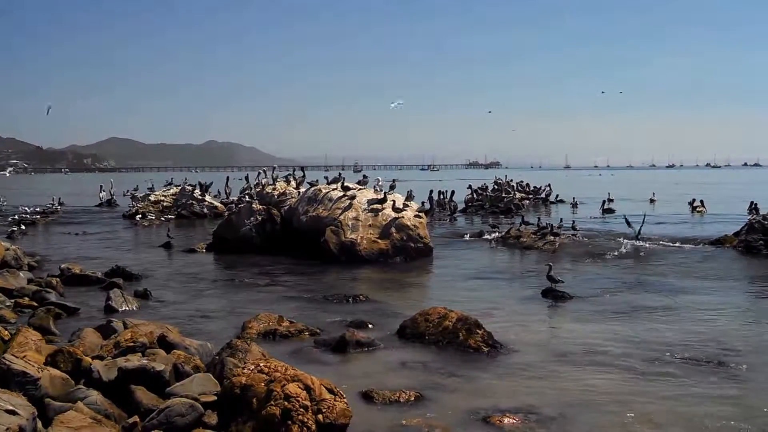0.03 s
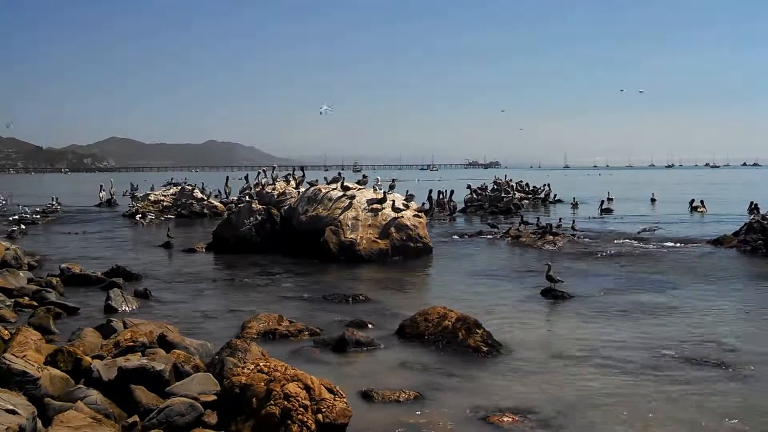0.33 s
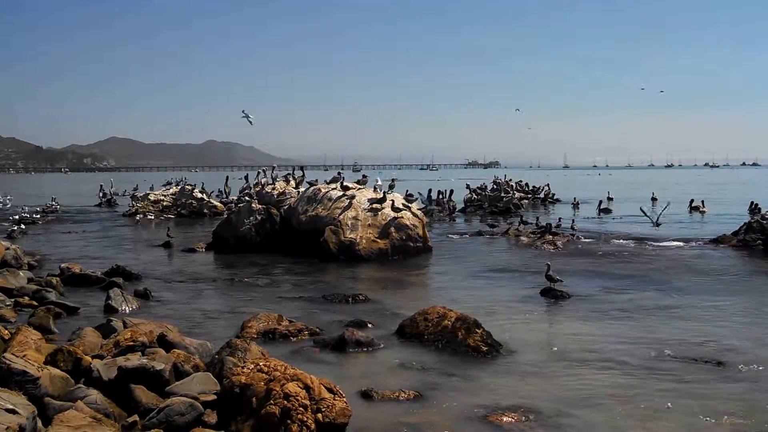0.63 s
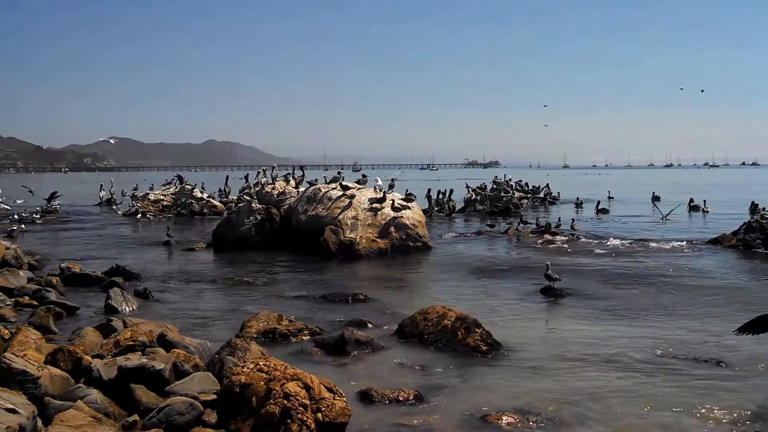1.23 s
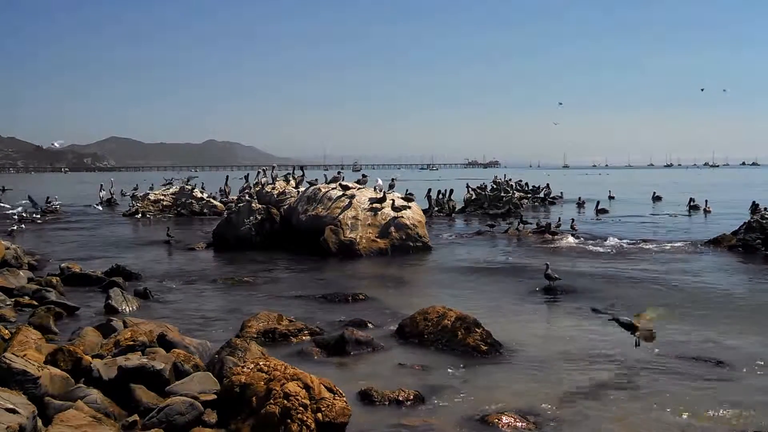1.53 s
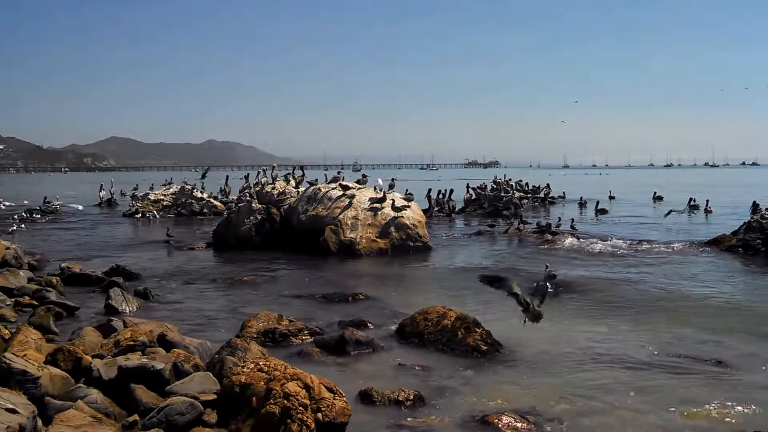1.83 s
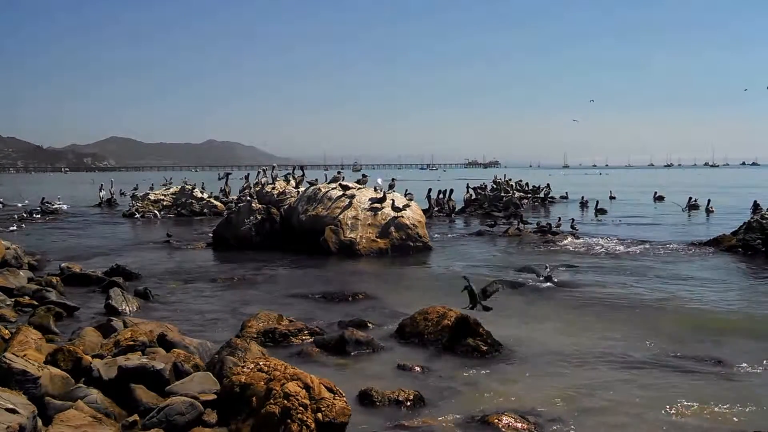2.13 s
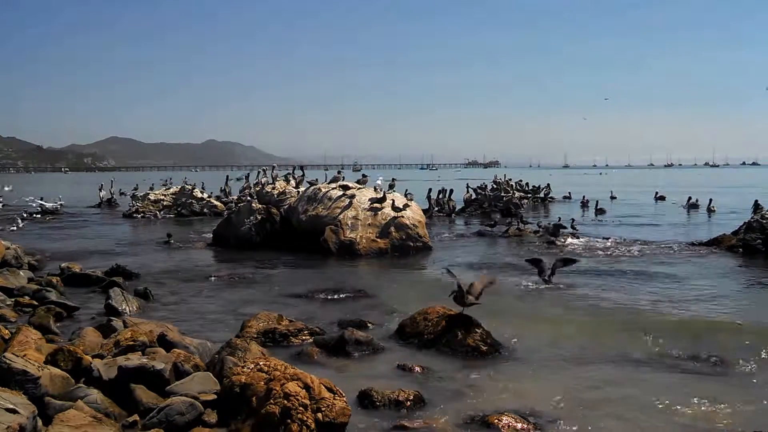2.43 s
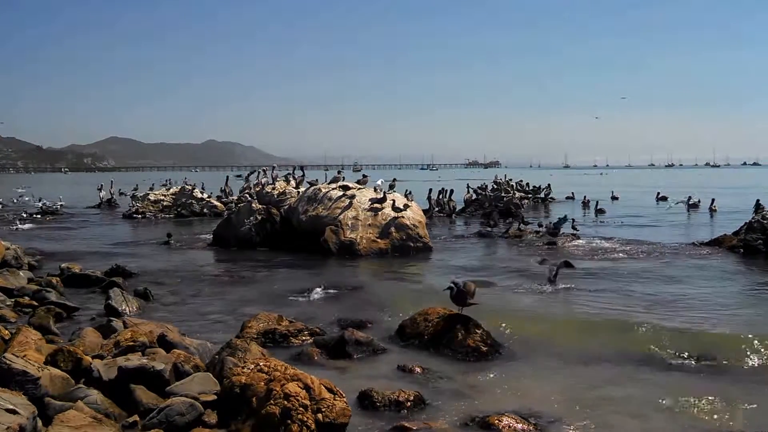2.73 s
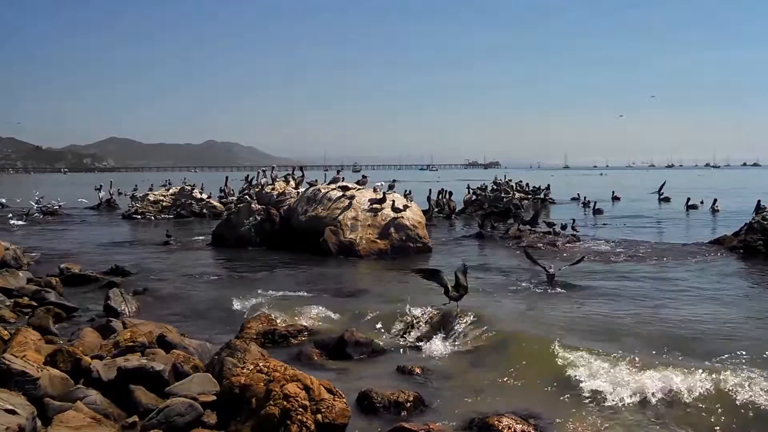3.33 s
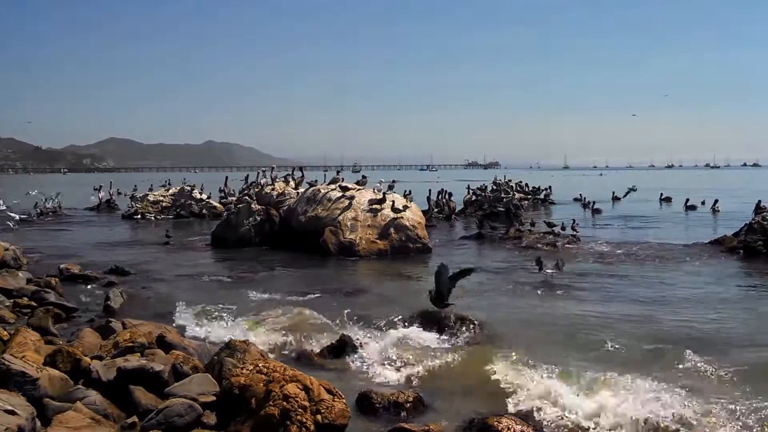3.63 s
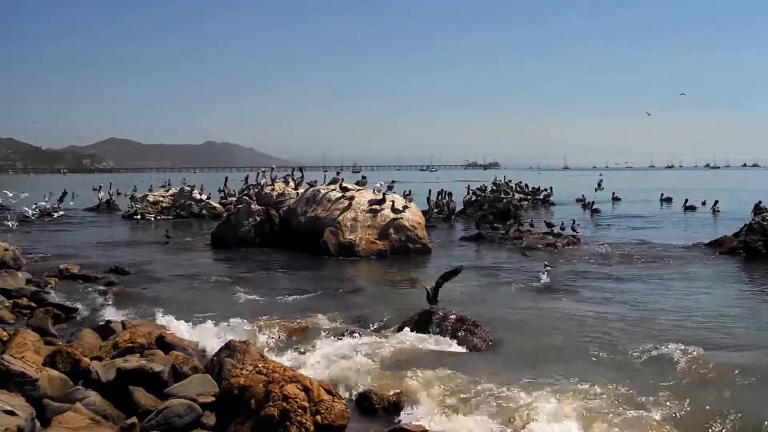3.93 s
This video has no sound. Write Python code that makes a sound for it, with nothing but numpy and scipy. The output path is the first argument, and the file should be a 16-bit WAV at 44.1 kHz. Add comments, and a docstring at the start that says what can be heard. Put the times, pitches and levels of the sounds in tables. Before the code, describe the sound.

A seabird colony calls in short bursts as water laps and a wave washes in.

```python
"""A seabird colony on offshore rocks. From the start, water laps on the stony shore under a distant
chatter, while gulls yelp hoarsely and mew nasally, their harmonics shaped by throat and bill. Thin
whistles join in, two drips tick on the stones, and a treble hiss swells with the calls. After two
seconds come fast, rattling trills; at three a wave breaks into a foam of ringing bubbles, and the
hiss rises as spray. Throughout, the right microphone is inverted and slightly late."""
import sys
import numpy as np
from scipy import signal
from scipy.fft import rfft, irfft, next_fast_len
from scipy.io import wavfile

SR = 44100
rng = np.random.default_rng(int(sys.argv[2]) if len(sys.argv) > 2 else 0)


def store_wav(level_fs):
    """Save 16-bit WAV to argv[1]."""
    pcm = np.round(np.clip(np.atleast_2d(level_fs), -1, 1) * 32767)
    wavfile.write(sys.argv[1], SR, pcm.T.astype(np.int16))


N = 176400
TIME = np.arange(N) / SR
FADE_S, JITTER_HZ = .022, 250
MEW_ARCH, MEW_FOCUS = .075, 1.3


def from_db(db):
    """Amplitude grows tenfold for every 20 dB."""
    return 10 ** (np.asarray(db) / 20)


def unit_rms(x):
    """Dividing by the rms gives unit mean power."""
    return x / np.sqrt(np.mean(x ** 2) + 1e-20)


def in_time(rows):
    """Linear interpolation gives a control value at every sample."""
    return np.interp(TIME, *np.transpose(rows))


def at_hz(rows, hz):
    """Interpolation on a logarithmic frequency axis reads a spectrum."""
    row_hz, values = np.transpose(rows)
    return np.interp(np.log(hz + 1e-9), np.log(row_hz), values)


def drift(rate_hz, size):
    """Interpolated noise wanders smoothly, mostly below the given rate."""
    position = np.arange(size) * 2 * rate_hz / SR
    knots = rng.standard_normal(size // 8 + 2)
    return np.interp(position, np.arange(len(knots)), knots)


def add(out, start_s, sound):
    """Superposition: a sound adds to the mix from its start time."""
    i = int(start_s * SR)
    a, b = max(i, 0), min(i + len(sound), N)
    if b > a:
        out[a:b] += sound[a - i:b - i]


def surging_noise(spectrum, surge_db, bands=19):
    """Partly coherent stereo noise in half-octave bands, each with a random amplitude modulation."""
    # Each row: frequency in Hz, coherence of the two microphones from 0 to 1.
    coherence = [(60, .98), (400, .52), (800, .6), (1400, .85)]
    out, common_surge = 0, drift(4, N)
    edges = np.geomspace(25, 18000, bands + 1)
    white = rng.standard_normal((2, 2, N))
    for k, (low, high) in enumerate(zip(edges, edges[1:])):
        band = signal.butter(2, [low, high], "band", fs=SR, output="sos")
        mid, side = signal.sosfilt(band, white[k % 2])
        hz = np.sqrt(low * high)
        alike = at_hz(coherence, hz)
        gain = from_db(at_hz(spectrum, hz) + surge_db * (.27 * common_surge + drift(14, N)))
        out = out + gain * (np.sqrt(1 + alike) * mid + np.sqrt(1 - alike) * side * [[1], [-1]])
    return unit_rms(out)


def pops(per_s, low_hz, high_hz, cycles, count=22):
    """Random impulses excite damped resonators, which decay by 60 dB in the given number of cycles."""
    born = rng.random(N) < per_s / SR
    size_db = 3.8 * np.minimum(rng.exponential(1, N), 4)
    impulses = born * from_db(size_db) * rng.choice([-1, 1], N)
    resonator, out = rng.integers(0, count, N), 0
    for k, hz in enumerate(np.geomspace(low_hz, high_hz, count)):
        r, w = from_db(-60 * hz / (cycles * SR)), 2 * np.pi * hz / SR  # pole radius and angle
        drive = impulses * (resonator == k) + 1e-18
        out = out + signal.lfilter([np.sin(w), -np.sin(w)], [1, -2 * r * np.cos(w), r * r], drive) / w
    return unit_rms(out)


def lapping():
    """Water moving on the stony shore radiates steady broadband noise."""
    # Each row: frequency in Hz, relative spectral density in dB.
    spectrum = [(30, 4), (65, 5), (150, -3.5), (400, -2), (800, -4.5), (2400, -2), (4000, -15), (5500, -58),
                (15000, -28)]
    return from_db(-32) * surging_noise(spectrum, surge_db=3)


def breaker():
    """A wash ebbs, then a wave breaks: broadband noise and the resonance of foam bubbles swell as one."""
    # Each row: frequency in Hz, relative spectral density in dB.
    spectrum = [(30, -31), (80, -7), (350, 4.5), (600, 0.5), (1200, -5), (4000, -10), (6000, -31),
                (15000, -17.5)]
    # Each row: time in seconds, gain of the wave in dB.
    swell = [(0, -35), (.4, -33), (1.0, -38.5), (1.35, -54), (2.4, -52), (2.88, -32), (3.05, -24.5),
             (3.3, -22.5), (3.6, -23), (3.9, -21)]
    mid, side = [pops(per_s=900, low_hz=390, high_hz=3900, cycles=7) for _ in range(2)]
    foam = from_db(-9.5) * (mid + .5 * side * [[1], [-1]])
    return from_db(in_time(swell)) * (surging_noise(spectrum, surge_db=2.5) + foam)


def treble_hiss():
    """Amplitude-shaped hiss swells with the gull calls, then rises as spray when the wave breaks."""
    # Each row: frequency in Hz, relative spectral density in dB.
    spectrum = [(2000, 24.5), (4000, -15), (8500, 24.5), (11000, -20), (14000, -17)]
    # Each row: time in seconds, relative level in dB.
    swell = [(0, -49.5), (1.12, -42), (1.35, -48), (1.7, -41.5), (2.8, -40.5), (3.07, -37), (3.55, -31.5),
             (4, -32.5)]
    crackle = from_db(-1) * pops(per_s=1500, low_hz=4150, high_hz=15500, cycles=3)
    hiss = surging_noise(spectrum, surge_db=1.5)
    return from_db(in_time(swell) - 2) * (hiss + crackle)


def drips():
    """A brief impact has a wide spectrum: each drip on stone is a bright, fast-decaying noise burst."""
    # Each row: start in seconds, relative level in dB.
    impacts = [(0.4425, -12.5), (0.6417, -23)]
    out, t = np.zeros(N), TIME[:SR // 30]
    for start, db in impacts:
        add(out, start, from_db(db) / 2 * rng.standard_normal(len(t)) * np.exp(-t / .0017))
    return signal.sosfilt(signal.butter(2, [5500, 14000], "band", fs=SR, output="sos"), out + 1e-18)


def rock_echoes(sound, t60_s=.25, cutoff_hz=7300):
    """Scattering from rocks and water acts as convolution with a dull, exponentially decaying tail."""
    t = TIME[:SR // 2]
    tail = rng.standard_normal(len(t)) * from_db(-60 * t / t60_s) * (t > .004)
    tail = signal.sosfilt(signal.butter(2, cutoff_hz, fs=SR, output="sos"), tail)
    return from_db(-16) * signal.fftconvolve(sound, tail / np.sqrt(np.sum(tail ** 2)))[:N]


def contour(length, hz, glide, arch=0):
    """Time, pitch and envelope of a call: a parabolic arch on a glide from 1 - glide to 1 + glide."""
    t = np.arange(int(length * SR)) / SR
    u = 2 * t / length - 1
    fade = np.clip(np.minimum(t, length - t) / FADE_S, 0, 1)
    return t, hz * (1 + glide * u - arch * u ** 2), np.sin(np.pi / 2 * fade) ** 2


def tone(pitch, harmonics_db):
    """A harmonic series: every partial runs at a whole multiple of one phase."""
    phase = 2 * np.pi * np.cumsum(pitch) / SR
    return unit_rms(sum(from_db(db) * np.sin((k + 1) * phase) for k, db in enumerate(harmonics_db)))


def gull_voice(pitch, throat_hz, rough, focus=1):
    """Source and filter: jittered harmonics pass the bill and a throat resonance that focus narrows."""
    # Each row: frequency as a multiple of the throat resonance, gain in dB.
    throat = [(.3, -26), (.56, -11), (.8, -1), (1, 4), (1.2, -2), (1.6, -14), (2.15, -9), (2.8, -15)]
    # Each row: frequency in Hz, gain of the bill in dB.
    bill = [(1300, 4), (2200, 5), (3900, 2.5), (4800, -17), (7000, -15), (9700, -10)]
    out, size = 0, len(pitch)
    jitter = 1 + .012 * rough * drift(JITTER_HZ, size)
    half_phase = np.pi * np.cumsum(pitch * jitter) / SR
    for k in range(2, 46):
        hz = k / 2 * pitch
        gain = from_db(focus * at_hz(throat, hz / throat_hz) + at_hz(bill, hz))
        if k % 2:  # period doubling puts partials between the harmonics
            gain *= .42 * rough
        offset = rng.uniform(0, 2 * np.pi)
        rasp = .42 * rough * drift(100, size)
        out = out + gain * np.sin(k * half_phase + offset + rasp)
    return unit_rms(out)


def chatter(per_s=18):
    """Faint mews from the rest of the colony superpose at random times."""
    out = np.zeros(N)
    for when, long, high, bright, rise in rng.random((int(per_s * N / SR), 5)):
        _, pitch, envelope = contour(.055 * (1 + long), 360 + 160 * high, (rise - .5) / 10, MEW_ARCH)
        voice = gull_voice(pitch, throat_hz=1850 * 2 ** bright, rough=.15, focus=MEW_FOCUS)
        add(out, when * N / SR, from_db(-38) * envelope * voice)
    return out


def mews():
    """A narrow, fixed formant makes the cleaner, arching calls of farther gulls sound nasal."""
    # Each row: start and length in seconds, central pitch in Hz, glide as a share of the pitch,
    # throat resonance in Hz, level in dB.
    calls = [(0.021, 0.075, 417, 0.052, 2230, -30.5), (.205, 0.062, 474, 0.043, 1900, -28),
             (.215, 0.051, 425, .03, 3500, -31.5), (0.44, 0.048, 463, 0.064, 3680, -29.5),
             (0.491, 0.065, 466, .06, 1900, -32), (.7, 0.071, 451, .04, 2020, -38),
             (0.93, 0.081, 467, .06, 1980, -30), (1.202, 0.062, 420, 0.039, 3520, -34),
             (1.25, 0.065, 515, -0.055, 2040, -35), (1.358, 0.095, 426, .01, 2880, -33),
             (1.41, .12, 482, 0.0035, 2040, -31), (1.562, 0.038, 421, 0, 3000, -27),
             (1.61, 0.069, 430, .04, 2500, -28.5), (1.697, 0.046, 440, 0.039, 3400, -31.5),
             (1.783, .16, 349.4, 0.059, 2320, -28.5), (1.904, 0.097, 520, -.03, 2450, -27),
             (1.934, 0.086, 472, 0.044, 1840, -29.5), (2.057, 0.15, 419, -0.055, 2270, -35.5),
             (2.302, .09, 482, 0.089, 1820, -29), (2.698, 0.082, 486, .03, 1990, -36),
             (2.696, .1, 482, -0.106, 1850, -34.5)]
    out = np.zeros(N)
    for start, length, hz, glide, throat_hz, db in calls:
        _, pitch, envelope = contour(length, hz, glide, MEW_ARCH)
        add(out, start, from_db(db) * envelope * gull_voice(pitch, throat_hz, rough=.2, focus=MEW_FOCUS))
    return out


def whistles(quaver_hz=85, droop_s=.011):
    """Piping notes with thin overtones quaver by joint amplitude and frequency modulation."""
    # Each row: start and length in seconds, central pitch in Hz, glide as a share of the pitch,
    # level in dB, first overtone in dB relative to the fundamental, depth of quaver.
    calls = [(0.297, 0.14, 2446, 0.022, -34, -12, 0.13), (0.988, 0.068, 2530, 0.023, -29, -17, 1),
             (1.049, .11, 2590, -0.0027, -25, -17.5, 0.36), (1.997, 0.193, 3925, 0.023, -36.5, -18, 0.83),
             (2.113, 0.16, 2895, -0.021, -20, -20.5, 0.088), (2.593, 0.11, 2480, .02, -28, -15, 0.73),
             (2.975, .07, 4010, 0.0045, -30, -9, 0.87), (3.026, 0.1, 3950, .015, -35, -10, 1.2),
             (3.013, 0.054, 3760, 0.021, -33, -6, 1), (3.076, 0.2, 2717, 0.0052, -22.5, -21, .08)]
    out = np.zeros(N)
    for start, length, hz, glide, db, overtone_db, depth in calls:
        t, pitch, envelope = contour(length, hz, glide)
        quaver = depth * (np.sin(2 * np.pi * quaver_hz * t) + drift(quaver_hz, len(t))) / 2
        droop = .09 * np.exp(-np.minimum(t, length - t) / droop_s)  # the pitch sags at both ends
        voice = tone(pitch * (1 - droop + .028 * quaver), [0, *(overtone_db - 6 * np.arange(5))])
        add(out, start, from_db(db) * envelope * (1 + quaver) * voice)
    return out


def trills(chirps_per_s=58):
    """Deep amplitude modulation chops a harsh note, strongest in harmonic two, into rising chirps."""
    # Each row: start and length in seconds, pitch in Hz, level in dB,
    # third harmonic in dB relative to the second.
    calls = [(2.277, .148, 1380, -23.5, -17), (2.497, .13, 1185, -27.5, -6), (2.803, .15, 1250, -32, -15)]
    out = np.zeros(N)
    for start, length, hz, db, third_db in calls:
        t, pitch, envelope = contour(length, hz, glide=.03)
        chirp_phase = np.pi * chirps_per_s * t + drift(chirps_per_s / 2, len(t)) / 4
        rasp = 1 + .4 * drift(600, len(t))
        bend = 1 - .035 * np.sin(2 * chirp_phase) + .028 * drift(JITTER_HZ, len(t))
        voice = tone(pitch * bend, [-17, 0, *(third_db - 6 * np.arange(4) ** 2)])
        add(out, start, from_db(db) * envelope * unit_rms(np.sin(chirp_phase) ** 2 * rasp * voice))
    return out


def yelps(shut_hz=1950):
    """A moving formant: as the bill opens and shuts, resonance, pitch and level rise and fall."""
    # Each row: midpoint and length in seconds, pitch in Hz, throat resonance with the bill wide open
    # in Hz, level at the midpoint in dB, roughness from 0 to 1.
    calls = [(.005, .067, 431, 2170, -21.5, .5), (.169, .105, 432, 2350, -16.3, .8),
             (.376, .1, 445, 2600, -19, .55), (.577, .093, 442, 2600, -24.5, .6),
             (.868, .091, 451, 3100, -23, .65), (1.115, .079, 449, 3400, -22.5, .55),
             (1.235, .11, 427, 2400, -27.5, .9), (1.473, .1, 457, 3120, -24, .8),
             (1.744, .12, 388, 2400, -23.5, 1), (2.655, .18, 308, 2900, -25.5, .6)]
    out = np.zeros(N)
    for midpoint, length, hz, open_hz, db, rough in calls:
        u = np.linspace(-1, 1, int(length * SR))
        opening = np.exp(-.5 * ((u + .13) / .22) ** 2)
        throat_hz = shut_hz + (open_hz - shut_hz) * opening
        pitch = hz * (1 + .03 * u - .17 * u ** 2)
        envelope = from_db(db - 19 * u ** 2) * signal.windows.tukey(len(u), .2)
        add(out, midpoint - length / 2, envelope * gull_voice(pitch, throat_hz, rough))
    return out


def scene():
    """The sources superpose: birds and their echoes straight ahead, the sea all around."""
    birds = yelps() + mews() + chatter() + whistles() + trills()
    return birds + rock_echoes(birds) + lapping() + breaker() + treble_hiss() + drips()


def record(dry, lag_s=.000362, cutoff_hz=15700):
    """Linear filtering leaves the right channel inverted, late and louder, and cuts the top of both."""
    # Each row: frequency in Hz, extra phase lag of the right channel in radians.
    right_phase = [(40, 0.027), (125, 0.65), (250, 0.56), (500, 1.28), (1000, 0.51), (1500, 0.12)]
    # Each row: frequency in Hz, level of the right channel over the left in dB.
    right_gain = [(50, 1.3), (200, 5.4), (2500, 2), (10000, .7)]
    size = next_fast_len(N + SR // 10)
    hz = np.arange(size // 2 + 1) * SR / size
    left, right = rfft(dry, size)
    tilt = from_db(at_hz(right_gain, hz) / 2)
    delay = np.exp(-1j * (2 * np.pi * hz * lag_s + at_hz(right_phase, hz)))
    lowpass = 1 / np.sqrt(1 + (hz / cutoff_hz) ** 200)
    return irfft(np.array([left / tilt, -right * tilt * delay]) * lowpass, size)[:, :N]


dry = scene()
out = record(dry)
store_wav(out)
```